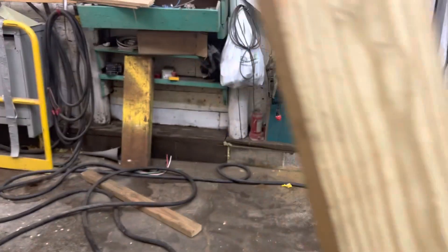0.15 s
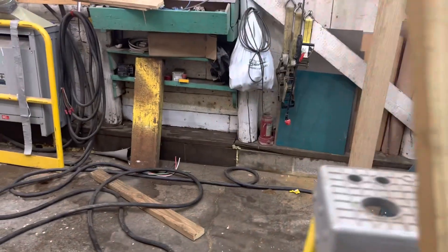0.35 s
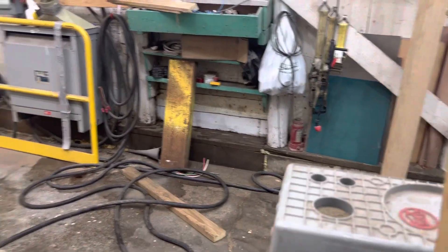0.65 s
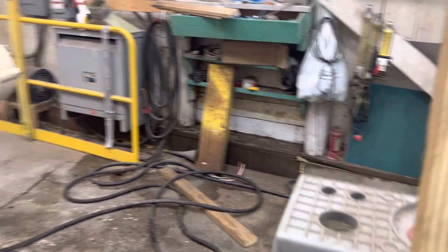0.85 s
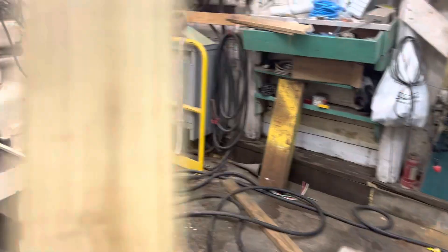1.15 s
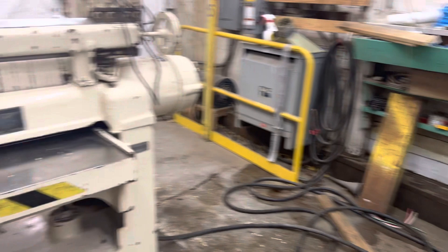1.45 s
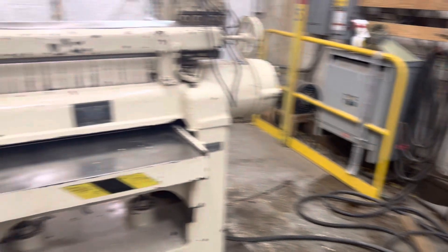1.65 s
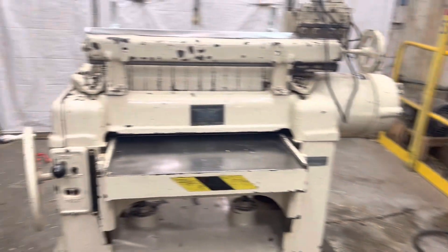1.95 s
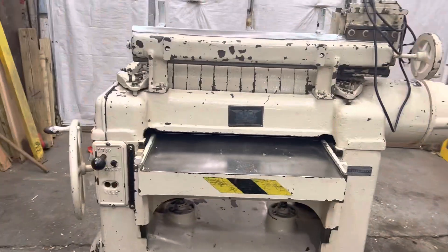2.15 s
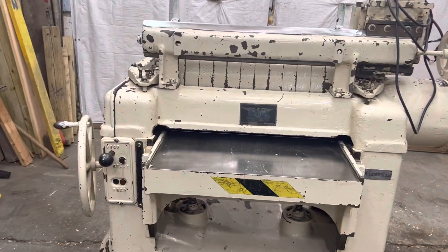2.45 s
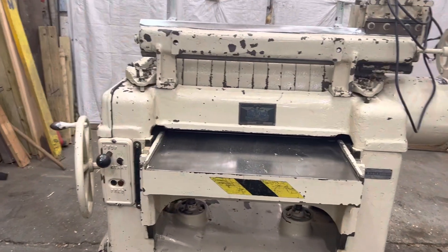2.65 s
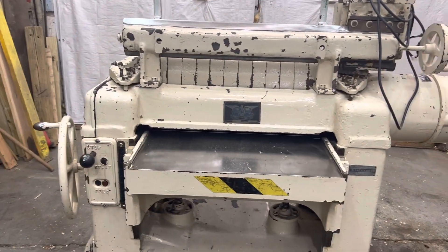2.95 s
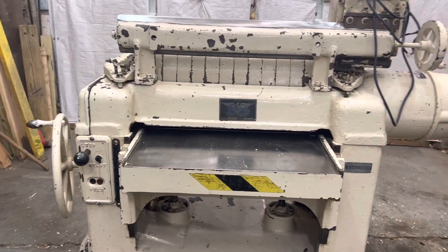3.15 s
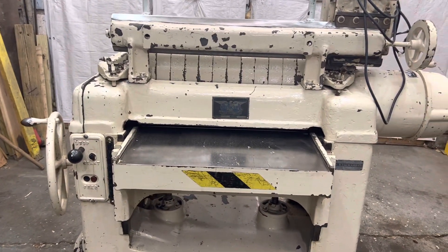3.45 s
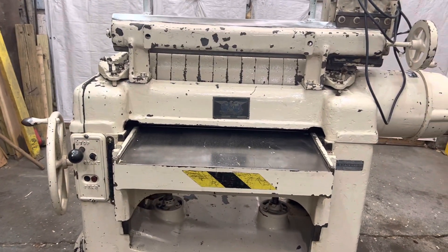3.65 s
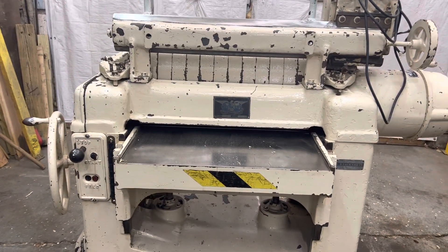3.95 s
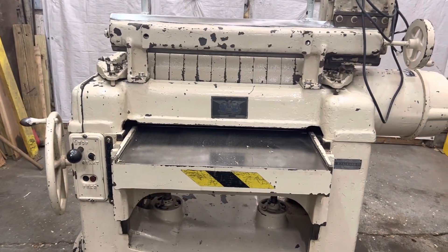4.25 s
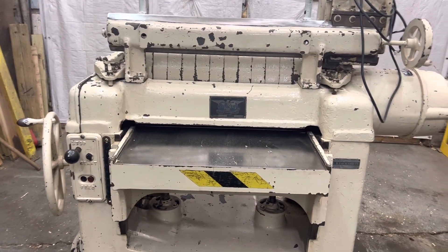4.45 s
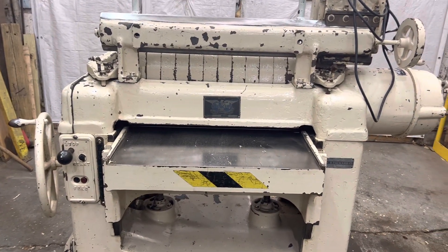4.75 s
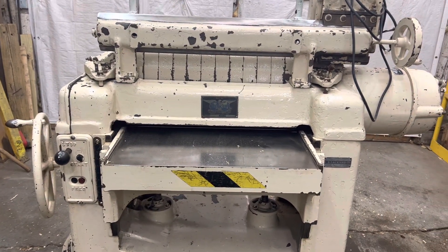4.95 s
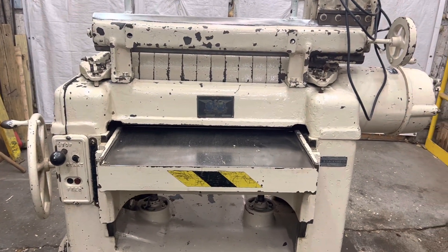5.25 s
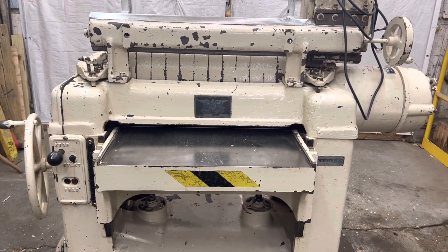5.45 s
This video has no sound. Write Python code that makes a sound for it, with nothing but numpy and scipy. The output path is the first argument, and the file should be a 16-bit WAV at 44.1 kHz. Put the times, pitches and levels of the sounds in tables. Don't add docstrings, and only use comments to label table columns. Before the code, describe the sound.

Steady machine drone around 180 hertz with rushing air, duller and wavering at first, then full and constant after a single board knock.

```python
import sys
import numpy as np
from scipy import signal
from scipy.io import wavfile
from scipy.ndimage import uniform_filter1d

SR = 44100
rng = np.random.default_rng(int(sys.argv[2]) if len(sys.argv) > 2 else 0)


def ratio(d):
    e = np.asarray(d, float) / 20
    return 10 ** e


def to_wav(sig):
    pcm = np.clip(np.atleast_2d(sig), -1, 1) * 32767
    pcm = np.round(pcm).astype(np.int16)
    wavfile.write(sys.argv[1], SR, pcm.T)


N = 247842
SHAFT_HZ, KNIVES = 59.74, 3


def evened(x):
    return x / np.sqrt(np.mean(abs(x) ** 2) + 1e-20)


def read(points, hz, axis=1):
    table = np.transpose(points)
    return np.interp(np.log(hz + 1), np.log(table[0] + 1), table[axis])


# (time [s], facing the machine [0-1], swing [0-1], left over right [dB], left lead [rad])
MIC_SWING = [
    (0, 0.21, 0.78, 3, 0.87),
    (.4, 0.21, 0.82, 0, 0.89),
    (.8, 0.47, 0.74, -1.5, 0.9),
    (1.2, 0.37, 0.75, 0, 0.53),
    (1.6, 0.76, 0.62, -0.1, 0.12),
    (2, 0.87, 0.57, -.5, 0.01),
    (2.5, 0.94, 0.46, 0, .01),
    (3.5, 0.97, 0.17, 0.6, 0.0084),
    (4.5, 0.98, 0.28, 0.2, 0.039),
    (5.62, 1., 0, 0.5, 0.048),
]


def mic(axis, step=64):
    table = np.transpose(MIC_SWING)
    return np.interp(np.arange(0, N + 2048, step) / SR, table[0], table[axis])


def between(near_db, away_db):
    return away_db + (near_db - away_db) * mic(axis=1)


def drift(hz, count):
    size = (N + 2047) // 64 + 1
    f = np.fft.fftfreq(4096, 64 / SR)
    z = rng.standard_normal((count, len(f))) + 1j * rng.standard_normal((count, len(f)))
    return evened(np.fft.ifft(z / (1 + (f / hz) ** 4), axis=1)[:, :size])


# (frequency [Hz], phase [rad])
PORT_LEAD = [(0, .06), (560, .1), (700, .55), (950, 0), (1700, -.7), (3300, 1), (4200, .35), (7900, .3),
             (8550, 0), (10270, -np.pi), (12050, -2 * np.pi), (13800, -3 * np.pi), (15550, -4 * np.pi),
             (17300, -5 * np.pi)]
# (frequency [Hz], level [dB])
PORT_TILT = [(60, 1.5), (180, 2), (380, .5), (1000, 1), (1400, 2.5), (2100, .5), (3100, 1), (4500, 4.8),
             (5500, 2.8), (6900, 3), (8100, 0), (16000, 0)]


def tone(hz, level_db, waver, blur=0):
    swing, pan_db, aside = (mic(axis=k) for k in (2, 3, 4))
    sides = [.5, -.5]
    both, opposed = drift(1.97, count=2)
    apart = np.clip(hz / 900, 0, 1) * (hz < 7600)
    split = 2.5 * np.clip(swing - .2, 0, 1) * apart ** 2 * np.outer([1, -1], opposed)
    echoes = np.clip(swing, 0, 1) * (waver * both + split)
    flutter = 0.055 * np.sqrt(hz / 200) * drift(12.4, count=1) + blur * drift(2.5, count=1)

    gains = ratio(np.outer(sides, read(PORT_TILT, hz) + pan_db))
    lead = read(PORT_LEAD, hz) + aside * (150 < hz < 7600)
    ports = gains * np.exp(1j * np.outer(sides, lead))
    slow = np.sqrt(2) * ratio(level_db) * (1 + echoes + flutter) * ports / np.sqrt(1 + blur ** 2)
    slow = slow * np.exp(2j * np.pi * (hz * np.arange(slow.shape[1]) * 64 / SR + rng.random()))

    ramp = np.arange(64)
    spin = np.exp(2j * np.pi * hz * ramp / SR)
    leaving = np.outer(slow[:, :-1], spin * (1 - ramp / 64))
    coming = np.outer(slow[:, 1:], spin * ramp / 64 / (spin[1] * spin[-1]))
    return (leaving + coming).real.reshape(2, -1)[:, :N]


# (knife multiple [-], time [s], length [s], level [dB])
STANDING_WAVES = [(1, 1.23, 0.25, 2), (2, 0.022, 0.18, 2.5), (2, .44, 0.046, -2.5), (2, 0.75, 0.086, -6),
                  (2, 1.8, 0.51, -6.5), (3, .02, .1, 2.5), (3, 0.27, 0.068, 3.5), (3, 0.742, 0.043, -17),
                  (3, 0.87, 0.058, -14), (3, 1.15, 0.03, -4), (3, 1.32, 0.032, -7), (6, .53, 0.042, -4),
                  (6, 0.74, 0.037, -10), (6, 1.25, 0.19, 7), (4, 0.24, 0.38, -13), (5, 1.99, 0.15, -9.5),
                  (7, 0.074, 0.16, 6.5), (7, 0.27, 0.22, -4.5), (8, .1, 0.14, -7), (8, 0.82, 0.4, 8),
                  (8, 1.1, 0.071, -12), (12, 0.69, 0.32, 8), (12, 1.93, .2, 13), (20, .85, .15, 6),
                  (9, 1.03, 0.46, -23), (10, 0.28, 0.073, 8), (10, 1.5, .27, -12), (10, 2.22, .13, -12),
                  (11, 0.35, 0.26, -10), (11, 0.68, .3, 1)]


def standing(k):
    t = np.arange(0, N + 2048, 64) / SR
    return sum(db * np.exp(-((t - s) / length) ** 2)
               for order, s, length, db in STANDING_WAVES if round(order) == k)


# (multiple of the knife rate [-], facing [dB], turned away [dB])
KNIFE_TONES = [(1, -19.5, -28.5), (2, -31.5, -33.5), (3, -26.5, -39.5), (4, -40, -46), (5, -41.5, -51.5),
               (6, -32.5, -53), (7, -42.5, -49.5), (8, -44.5, -58), (9, -44.5, -56.5), (10, -52.5, -59),
               (11, -50.5, -56), (12, -69, -58), (13, -57.5, -64), (14, -62.5, -81), (15, -51.5, -92),
               (16, -54, -68.5), (17, -80, -73), (18, -62, -77), (19, -62.5, -74), (20, -61, -68),
               (21, -64, -70), (22, -63.5, -72), (23, -63, -76), (24, -71, -82), (26, -67, -80),
               (30, -71, -93)]
# (multiple of the shaft rate [-], facing [dB], turned away [dB])
SHAFT_TONES = [(1, -48.5, -49), (2, -47, -45), (10, -61, -52.5), (11, -55, -66), (13, -51, -62),
               (17, -43.5, -60.5), (19, -48.5, -84), (20, -56, -72), (22, -64, -56), (23, -53, -73),
               (32, -84, -80), (59, -78, -73)]
STEADY_TONES = (1, 2, 3, 6)


def cutterhead():
    out = np.zeros((2, N))
    for k, near, away in KNIFE_TONES:
        waver = .1 if round(k) in STEADY_TONES else .2
        out += tone(round(k) * KNIVES * SHAFT_HZ, between(near, away) + standing(round(k)), waver)
    for k, near, away in SHAFT_TONES:
        out += tone(round(k) * SHAFT_HZ, between(near, away), waver=.3 * (k > 3), blur=.8 * (round(k) == 2))
    return out


# (frequency [Hz], level facing [dB per Hz], loss when turned away [dB])
AIR_RUSH = [(12, -100, 0), (42, -86, 3), (62, -73.5, -12), (93, -58, 14.5), (205, -67.5, -2.5),
            (422, -60, 3.5), (900, -68, 4.5), (1340, -68.5, 10.5), (1990, -72.5, 3), (3040, -75, 5),
            (5020, -84, 0.5), (6500, -86, 2), (9000, -87, 4.5), (16100, -92.5, 5)]
# (frequency [Hz], width [Hz], level [dB])
CABINET_MODES = [(117, 55, 5.5), (152.6, 17.6, 18), (227.5, 32.4, 14), (329.5, 48, 7), (486.4, 44, 11),
                 (634, 220, 6), (1097, 260, 8.5), (1622, 160, 6.5), (2690, 240, 1.5), (4760, 500, 3)]
# (frequency [Hz], likeness [0-1])
PORT_LIKENESS = [(60, .995), (340, .95), (650, .8), (900, .7), (1100, .9), (1500, .75), (2100, .6),
                 (2750, .8), (3800, .5), (4600, .7), (5600, .38), (7000, .62), (8000, .72), (8600, .86),
                 (16000, .88)]


def rush():
    facing, hz = mic(axis=1, step=512), np.fft.rfftfreq(2048, 1 / SR)
    a, b, c, d, patches = rng.standard_normal((len(facing), len(hz), 5)).T
    patches = evened(uniform_filter1d(uniform_filter1d(patches, size=14, axis=0), size=9, axis=1))
    body = 1 + sum((ratio(db) - 1) / (1 + (2 * (hz - f) / w) ** 2) ** 2 for f, w, db in CABINET_MODES)
    lost_db = read(AIR_RUSH, hz, axis=2)[:, None] * (1 - facing)
    level_db = read(AIR_RUSH, hz)[:, None] - lost_db + .8 * patches

    unlike = (1 - facing) * .6 * (np.clip(hz / 800, 0, 1) * (hz < 3000))[:, None]
    same = np.clip(read(PORT_LIKENESS, hz)[:, None] * (1 - unlike), 0, 1)
    left = a + 1j * b
    right = same * left + np.sqrt(1 - same ** 2) * (c + 1j * d)
    right = right * np.exp(-1j * read(PORT_LEAD, hz))[:, None]
    tilt = ratio(read(PORT_TILT, hz) / 2)[:, None]
    z = np.array([left * tilt, right / tilt]) * ratio(level_db + 10) * body[:, None]
    air = signal.istft(z, nperseg=2048, noverlap=1536)[1][:, :N]

    turn = 2 * np.pi * SHAFT_HZ * np.arange(N) / SR
    gusts = .025 * drift(9, count=1).real.repeat(64)[:N]
    return air * (1 + .08 * np.cos(KNIVES * turn) + .05 * np.cos(turn) + gusts)


# (time [s], level [dB], time until the hand damps it [s], time to a small rebound [s])
BOARD_KNOCK = (.6058, -13.7, .057, .028)
# (frequency [Hz], level [dB], fall by 60 dB [s], rise [s])
BOARD_MODES = [(328, -6, 1.5, .008), (524, 0, .33, .0005), (660, -1, .04, .0004), (765, -4.5, .19, .0005),
               (900, -12, .03, .0004), (1030, -10.5, .12, .0007), (1300, -18, .03, .001),
               (1420, -18, .05, .001), (1572, -14, .14, .001), (1750, -19, .08, .002),
               (2153, -21, .06, .004)]


def board():
    s, blow_db, held, rebound = BOARD_KNOCK
    t = np.arange(SR // 2) / SR
    modes = [ratio(db - 60 * t / t60) * (1 - np.exp(-t / rise)) * np.sin(2 * np.pi * hz * t)
             for hz, db, t60, rise in BOARD_MODES]
    again = np.roll(sum(modes[2:]), round(rebound * SR)) * (t > rebound)
    ring = (sum(modes) + ratio(-9) * again) * ratio(blow_db - 1100 * np.maximum(t - held, 0))

    taps = rng.choice([-1., 1.], (2, len(t))) * (rng.random((2, len(t))) < .04)
    taps = taps * ratio(-60 * t / .35) * (t > .008)
    wet = signal.fftconvolve(ring[None], taps / np.linalg.norm(taps[0]), axes=1)[:, :len(t)]
    direct = np.array([ring * ratio(1), np.roll(ring, 6) * ratio(-1)])
    out, at = np.zeros((2, N)), round(s * SR)
    out[:, at:at + len(t)] = direct + ratio(-16) * wet
    return out


# (frequency [Hz], facing [dB], turned away [dB], blur [tenths of the steady tone])
GEAR_TONES = [(29.5, -63.5, -63.5, .1), (417, -54, -54, 2.), (665.3, -44, -46, 1.), (1116, -53, -60, 2.),
              (1470, -62, -64, 1.5), (2116, -65, -62, 2.), (2941, -65, -73, 1.5), (4352, -64, -68, 1.5),
              (4819, -69, -60, 1.5), (4839, -66, -84, 1.)]
# (frequency [Hz], level [dB])
BEARING_WHINE = [(4936, -72), (5173, -70), (5378, -73), (5582, -76), (6115, -73), (6288, -77), (6880, -72),
                 (7176, -79), (8172, -76), (8409, -77), (8468, -77), (8527, -76), (8586, -73), (8759, -79),
                 (8993, -72), (9053, -70), (9171, -72), (9351, -73), (9701, -67), (9818, -74), (10110, -76),
              (10230, -72), (10522, -77), (10582, -75), (10756, -75), (11170, -76), (13510, -81),
              (13930, -79), (14050, -80)]


def drive():
    out = np.zeros((2, N))
    for hz, near, away, blur in GEAR_TONES:
        out += tone(hz, between(near, away), waver=.12, blur=0.1 * blur)
    for hz, db in BEARING_WHINE:
        out += tone(hz, between(db, db - 3), waver=.6, blur=.4)
    return out


# (time [s], level [dB], frequency [Hz], length [s])
FOOT_STEP = (3.16, -33, 85, .05)


def footfall():
    s, db, hz, length = FOOT_STEP
    t = np.arange(N) / SR - s
    return ratio(db) * np.exp(-(2.5 * t / length) ** 2) * np.sin(2 * np.pi * hz * t)


def scene():
    return cutterhead() + rush() + board() + drive() + footfall()


def low_pass(x):
    return signal.sosfilt(signal.butter(12, 15750, fs=SR, output="sos"), x)


def record(dry):
    hz, t, z = signal.stft([dry[0] + dry[1], dry[0] - dry[1]], SR, nperseg=2048, boundary="odd")
    power = uniform_filter1d(uniform_filter1d(abs(z) ** 2, size=16, axis=1), size=3, axis=2)[:, 8::16]
    weak = (power < ratio(-15) * power[::-1]).repeat(16, axis=1)
    z[:, :-1] *= 1 - weak * (hz[:-1, None] > 7600)
    both, apart = signal.istft(z, SR, nperseg=2048)[1][:, :N] / 2
    return low_pass(np.array([both + apart, both - apart]))


dry = scene()
out = record(dry)
to_wav(out)
```